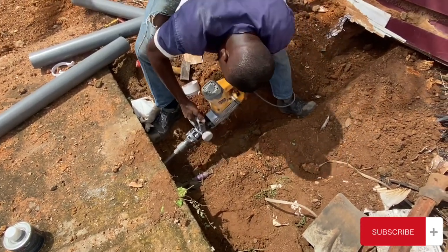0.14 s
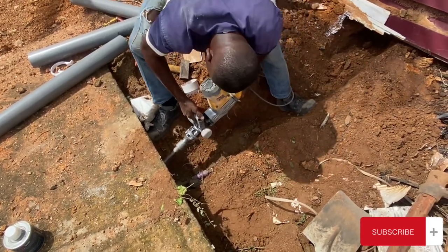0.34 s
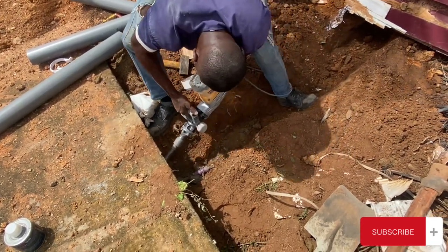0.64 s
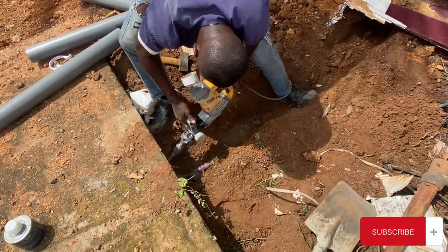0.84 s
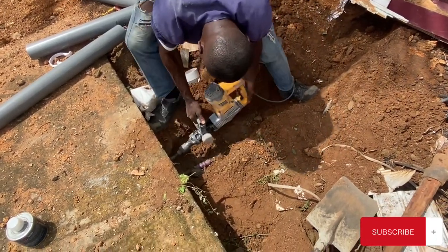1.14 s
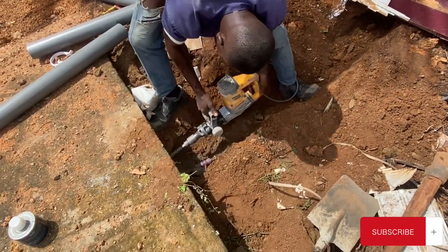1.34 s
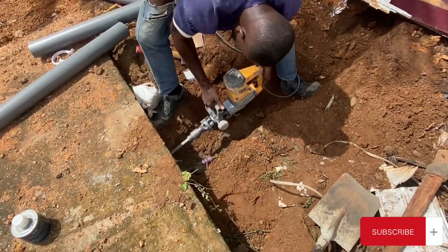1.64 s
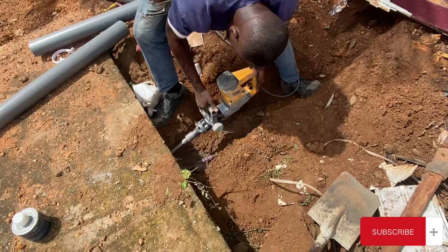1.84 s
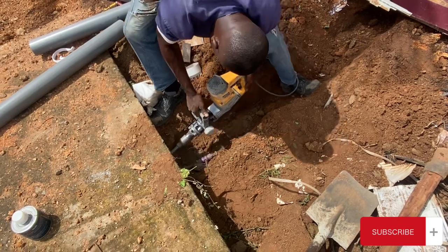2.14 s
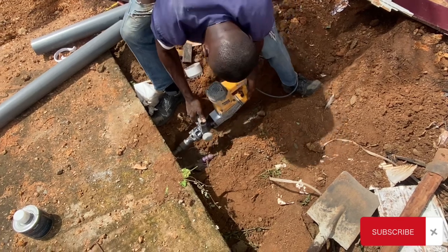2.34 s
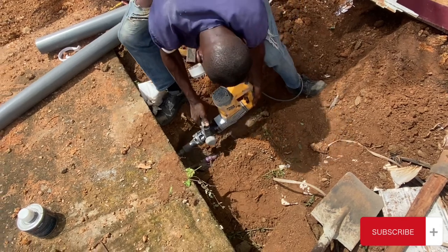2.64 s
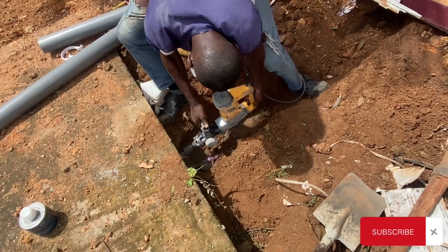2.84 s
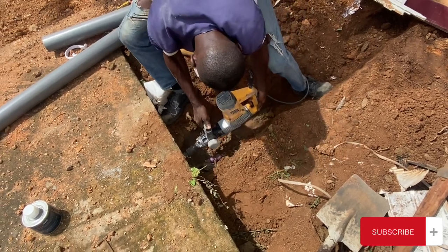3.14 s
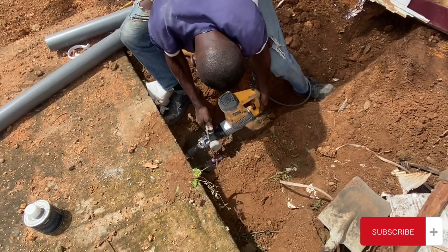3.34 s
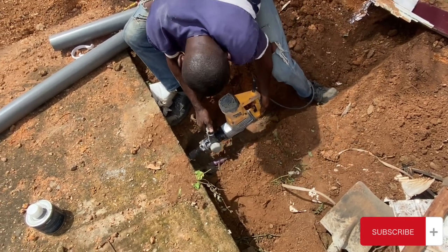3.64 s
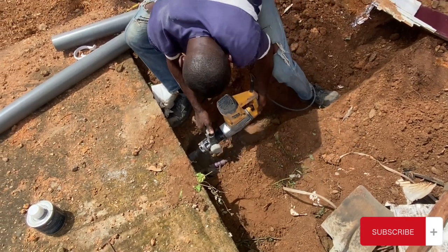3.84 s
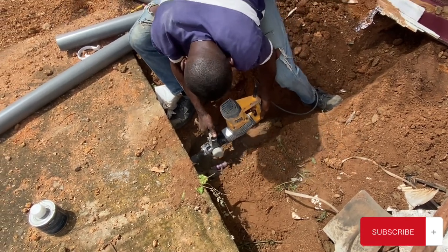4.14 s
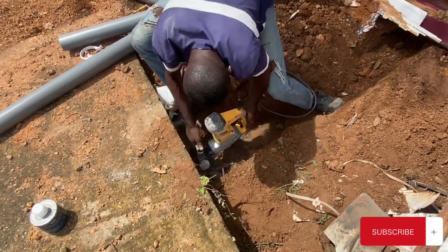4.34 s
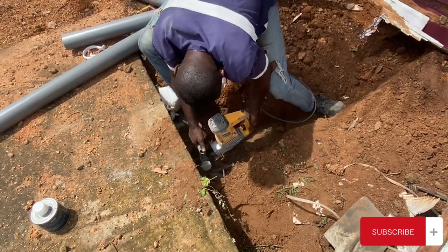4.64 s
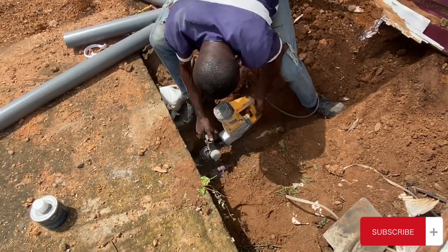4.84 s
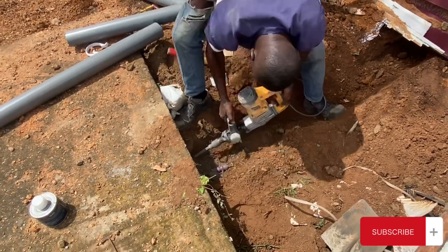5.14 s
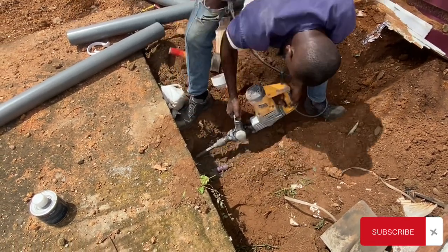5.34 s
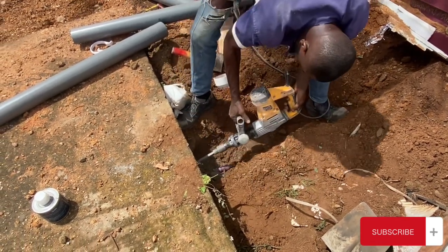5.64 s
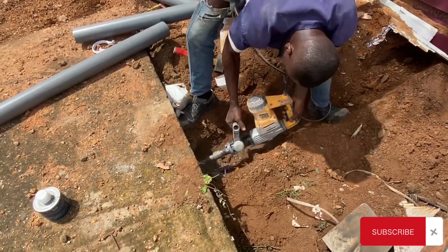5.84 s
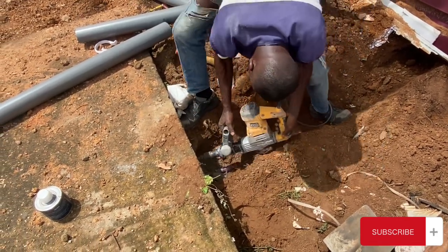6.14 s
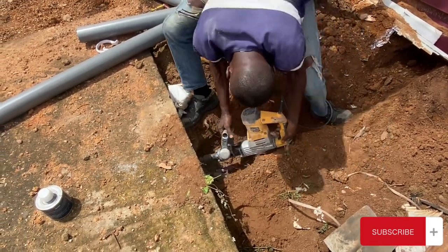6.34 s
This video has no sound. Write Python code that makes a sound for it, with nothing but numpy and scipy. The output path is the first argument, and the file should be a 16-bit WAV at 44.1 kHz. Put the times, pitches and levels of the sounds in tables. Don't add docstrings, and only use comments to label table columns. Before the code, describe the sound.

A heavy electric breaker works very near the microphone on an open building site with almost no echo. Three bursts of fast, dry, stony cracks with steel ring, casing clatter and low soil thumps, about thirty-seven blows a second. Between bursts a gritty motor whirr slows into separate chuffs. Small rattles surround the work; a faint site hum and a tiny distant bird call come before the first burst.

```python
import sys
import numpy as np
from scipy import signal
from scipy.fft import rfft, irfft, next_fast_len
from scipy.io import wavfile
from scipy.ndimage import uniform_filter1d

SR = 44100
rng = np.random.default_rng(int(sys.argv[2]) if len(sys.argv) > 2 else 0)


def log_audio(samples):
    frames = np.atleast_2d(samples).T
    limited = np.clip(frames, -1, 1)
    pcm = np.round(limited * 32767).astype(np.int16)
    wavfile.write(sys.argv[1], SR, pcm)


def elevation(decibels):
    levels = np.asarray(decibels, float)
    return 10 ** (levels / 20)


N = 285768
TIME = np.arange(N) / SR
HZ = np.maximum(np.fft.rfftfreq(N, 1 / SR), 1)


def in_time(rows):
    s, *columns = np.transpose(rows)
    return [np.interp(TIME, s, c) for c in columns]


def at_hz(points):
    hz, value = np.transpose(points)
    return np.interp(np.log(HZ), np.log(hz), value)


def rms_one(x):
    return x / np.sqrt(np.mean(x ** 2))


def noise(gain):
    return rms_one(irfft(rfft(rng.standard_normal((2, N))) * gain, N))


def drift(rate):
    step = max(int(SR / rate / 12), 1)
    lowpass = signal.butter(2, rate, fs=SR / step, output="sos")
    slow = signal.sosfilt(lowpass, rng.standard_normal(N // step + 102))[100:]
    return np.interp(np.arange(N) / step, np.arange(len(slow)), rms_one(slow))


def clicks(s, size):
    out = np.full(np.shape(size)[:-1] + (N,), 1e-18)
    out[..., np.clip(np.round(s * SR).astype(int), 0, N - 1)] = size
    return out


def fade(x, t60, rise_s):
    r, rise = elevation(-60 / (t60 * SR)), np.exp(-1 / (rise_s * SR))
    return signal.lfilter([1], [1, -r], signal.lfilter([1 - rise], [1, -rise], x))


def struck(modes, s, db, spread_db):
    out = 0
    chance = rng.standard_normal((len(s), len(modes), 2)).T
    for (hz, mode_db, t60), luck in zip(modes, chance.transpose(1, 0, 2)):
        r, w = elevation(-60 / (t60 * SR)), 2 * np.pi * hz / SR
        hits = clicks(s, elevation(db + mode_db + spread_db * luck))
        out = out + signal.lfilter([0, np.sin(w)], [1, -2 * r * np.cos(w), r * r], hits)
    return out


# first blow in seconds, last blow in seconds, number of blows,
# time lost gathering speed in seconds.
RUNS = [
    (.534, 1.134, 21, .047),
    (1.923, 3.091, 42, .045),
    (3.118, 3.199, 4, 0),
    (3.2256, 3.489, 11, 0),
    (3.515, 4.216, 27, 0),
    (4.243, 4.355, 5, 0),
    (6.341, 6.464, 4, .062),
]
GATHER_BLOWS = 2.8


def strokes():
    s, slow = [], []
    for first, last, blows, lost in RUNS:
        n = np.arange(blows)
        late = lost * (1 - np.exp(-n / GATHER_BLOWS))
        s.append(first + late + n / n[-1] * (last - first - late[-1]))
        slow.append((lost > 0) * np.exp(-n / GATHER_BLOWS))
    return np.concatenate(s), np.concatenate(slow)


LOAD_FADE_S = 0.028


def load():
    on = sum((TIME > a) & (TIME < b + .027) for a, b, *_ in RUNS).clip(0, 1)
    r = np.exp(-1 / (LOAD_FADE_S * SR))
    return np.maximum(uniform_filter1d(on * 1., size=2000), signal.lfilter([1 - r], [1, -r], on))


# frequency in Hz, density in dB per Hz.
CRACK_COLOUR = [(300, -1.5), (700, -7.5), (860, -15), (1050, -7.5), (1500, -7), (2200, -1.5), (3000, 2),
                (4500, -0.5), (6200, -1), (7500, -1), (9500, 4), (11300, 5), (12600, 13), (14000, -19),
                (15500, -8)]


def crack(s, db, bounce_s, bounce_db):
    out, spectrum = 0, rfft(noise(elevation(at_hz(CRACK_COLOUR))))
    for hz in np.geomspace(300, 15000, 7):
        luck = rng.standard_normal((len(s), 3)).T
        band_gain = np.clip(1 - np.abs(np.log(HZ / hz) / np.log(50) * 6), 0, 1)
        band = irfft(spectrum * band_gain, N)
        hits = clicks(s + 0.00056 * np.abs(luck[0]), elevation(db + 2.9 * luck[1]))
        hits = hits + clicks(bounce_s, elevation(bounce_db + 3.5 * luck[2]))
        t60 = 0.023 * (hz / 4000) ** -.2
        snap = fade(hits, t60, rise_s=0.00042)
        tail = elevation(-14.5) * fade(hits, 2.85 * t60, rise_s=0.003)
        out = out + band * (snap + tail)
    grit_db = 3.1 * np.clip(drift(1280), -2, 2)
    return elevation(grit_db) * out


# frequency in Hz, level in dB, t60 in seconds.
CASING = [(1308, 8.5, 0.059), (1488, -3, 0.06), (1841, -1.5, 0.027), (2400, 10.5, 0.087),
          (2900, -23, 0.036), (3533, 7.5, 0.027), (4435, 8, 0.049), (6220, 8, 0.065), (8115, 18.5, 0.027)]
SUNK_CASING_DB = [-17.5, 10.5, -6, 0.5, 0, -18.5, 0, -7, 2]
CASING_DB = -32.5


def clatter(s, db, bounce_s, bounce_db, clatter_db, depth):
    casing = [(hz, mode_db + sunk_db * np.tile(depth, 2), t60)
              for (hz, mode_db, t60), sunk_db in zip(CASING, SUNK_CASING_DB)]
    hits_db = np.r_[db + clatter_db, bounce_db + clatter_db] + CASING_DB
    return struck(casing, np.r_[s + .001, bounce_s], hits_db, spread_db=4.5)


# frequency in Hz, level in dB, t60 in seconds.
CHISEL = [(11042, 0, .2), (11080, 2.5, .09), (9535, -6, .05), (10400, -7, .05), (14130, -12, .05),
          (8400, -14, .03)]
RING_DB, REBOUND_RING_DB = -0.5, -1.5
SUNK_HUM_DB, SLOW_RING_DB = -12, -6


def chisel_ring(s, bounce_s, ring_db, slow, depth, late):
    steel = [(hz, mode_db + SUNK_HUM_DB * np.tile(depth, 2) * (t60 > .1), t60) for hz, mode_db, t60 in CHISEL]
    hits_db = np.tile(RING_DB + ring_db + SLOW_RING_DB * slow, 2) + REBOUND_RING_DB * np.r_[late, ~late]
    return struck(steel, np.r_[s, bounce_s], hits_db, spread_db=4.5)


# frequency in Hz, level in dB, t60 in seconds.
GROUND = [(106, -3.5, 0.12), (135, -27, 0.091), (185.4, -5.5, 0.19), (224, -11.5, 0.15), (259, -11, 0.085),
          (343.6, -6.5, 0.18), (384, -9.5, 0.2), (404, -6.5, 0.077), (478, 2, 0.053), (641.5, -9, 0.11),
          (708, -7, 0.053), (744, -27, 0.15), (777, -25, 0.053)]
# delay in seconds, level in dB, brightness in dB per octave.
PUSHES = [
    (.0012, -3.5, 16),
    (.0055, -12.5, 15),
    (0.0188, -4, -3),
]
THUMP_DB, SUNK_THUMP_DB, BRIGHT_DB, SUNK_BRIGHT_DB = -44.5, 12.5, -4, 7.5
BREAK_S, BROKEN_THUMP_DB, GIVING_BRIGHT_DB = 4.23, -21, -1
SETTLED_S, SETTLED_HZ, SETTLED_DB = 3.56, 230, 4
JITTER_S = .00004


def thump(even, depth):
    thump_db, bright_db = THUMP_DB + SUNK_THUMP_DB * depth, BRIGHT_DB + SUNK_BRIGHT_DB * depth
    thump_db += BROKEN_THUMP_DB * depth * (even > BREAK_S)
    giving = np.gradient(even) < 1 / 37.4
    bright_db += GIVING_BRIGHT_DB * uniform_filter1d(1. * giving, size=7)
    delay, push_db, tilt_db = np.transpose(PUSHES)[:, :, None]
    ground = []
    for hz, mode_db, t60 in GROUND:
        boom_db = SETTLED_DB * (even > SETTLED_S) * (hz < SETTLED_HZ)
        colour_db = (tilt_db + bright_db) * np.log2(hz / 400) + boom_db
        ground.append((hz, mode_db + colour_db.ravel(), t60))
    s = even + JITTER_S * rng.standard_normal(len(even)) + delay
    return struck(ground, s.ravel(), (thump_db + push_db).ravel() + 3, spread_db=1.5)


# time in seconds, force in dB, depth from 0 to 1,
# casing rattle in dB.
BITE = [(.53, -13, 0.15, -2.5), (.72, -15, 0.15, 0), (.8, -10, 0, -1.5), (1.14, -9, 0.17, -1.5),
        (1.92, -15, 0, -4), (2.2, -13, 0, -2), (2.42, -11, 0.21, 0), (2.62, -8, 0.77, -7),
        (2.68, -14, 0.43, -5), (3.0, -10, 0.74, 1), (3.2, -18, 0.95, 0.5), (3.62, -14, 0.74, 2),
        (4.2, -21, 0.9, 8.5), (4.3, -15.5, 0.9, 2.5), (4.36, -17.5, 0.93, 6), (6.34, -12, 1, 2),
        (6.39, -16, 1, -3.5), (6.47, -3, 0.34, 7.5)]
# time in seconds, peak in dB, chisel ring # under
# it in dB.
BLOW_CRACKS = [(0.5314, -12.5, -13), (0.5755, -6.5, -33), (0.6126, -14, -7), (0.648, -7.5, -14),
               (0.678, -11.5, -27), (0.7088, -12, -12), (0.7402, -9.5, -18), (0.7684, -5, -17),
               (0.797, -6.5, -24), (0.8249, -3.5, -25), (0.854, -9.5, -10), (0.8826, -5, -25),
               (0.9094, -10, -11), (0.9378, -4.5, -20), (0.9667, -7.5, -21), (0.992, -3, -18),
               (1.0224, -8, -8.5), (1.0493, -7, -12), (1.0772, -3, -20), (1.104, -6.5, -17),
               (1.1364, -7.5, -11),
               (1.9239, -12.5, -18), (1.9661, -10.5, -14), (2.0106, -14, -2.5), (2.038, -8, -21),
               (2.07, -9, -18), (2.0975, -6, -13), (2.136, -11, -7), (2.1615, -13, -10),
               (2.1858, -12.5, -4.5), (2.2129, -2.5, -15.5), (2.2419, -11.5, -4.5), (2.2753, -11.5, -12),
               (2.2973, -5, -15.5), (2.3253, -2.5, -17), (2.359, -13, -4), (2.386, -9, -13),
               (2.409, -6, -20), (2.4362, -5.5, -15), (2.4645, -7.5, -10), (2.4972, -8, -15),
               (2.5178, -4.5, -11.5), (2.542, -5, -30), (2.5714, -7, -14), (2.598, -4.5, -20),
               (2.6265, -4.5, -14.5), (2.654, -11, -9), (2.681, -9.5, -21), (2.7088, -15, -6),
               (2.736, -6.5, -22), (2.7628, -14, -12), (2.7982, -15, -10), (2.8223, -15, -18),
               (2.844, -10.5, -29), (2.8726, -12, -8.5), (2.9044, -17, -12), (2.9311, -15, -5.5),
               (2.9537, -11, -25), (2.9811, -12, -13.5), (3.0086, -12, -11), (3.0335, -12.5, -31),
               (3.0624, -12.5, -29), (3.0898, -14, -15), (3.1175, -11, -25),
               (3.0903, -10.5, -28), (3.1168, -8.5, -27), (3.1426, -12, -30), (3.1715, -11, -18),
           (3.1973, -10.5, -16), (3.2247, -15.5, -32), (3.251, -10, -39), (3.2775, -11.5, -16),
           (3.3036, -12, -16), (3.3299, -8, -26), (3.357, -14, -20), (3.3831, -10, -18), (3.4082, -14, -32),
           (3.4355, -10, -36), (3.461, -13, -26), (3.487, -12.5, -20), (3.5143, -11, -24),
           (3.5477, -15.5, -11.5), (3.5701, -8, -36), (3.5958, -12, -30), (3.6232, -13, -16),
           (3.6498, -15, -17), (3.676, -12, -25), (3.711, -17.5, -8), (3.7313, -11, -24), (3.757, -13, -25),
           (3.784, -12, -29), (3.8118, -12.5, -30), (3.838, -15, -25), (3.8656, -15.5, -25),
           (3.892, -11.5, -24), (3.9192, -10.5, -33), (3.9463, -13, -33), (3.973, -12, -32),
           (4.0008, -11, -26), (4.0276, -13.5, -29), (4.0553, -12, -27), (4.08, -14.5, -27),
           (4.108, -16.5, -15), (4.133, -13, -32), (4.162, -14, -35), (4.1874, -16.5, -28),
           (4.2154, -16, -33), (4.2435, -13.5, -32), (4.272, -14, -18), (4.2988, -14.5, -14),
           (4.329, -7, -31), (4.354, -17.5, -10),
               (6.3405, -14.5, -24),
    (6.39, -9.5, -13.5),
    (6.4292, -8, -26),
    (6.465, -9, -14),
]
LATE_S = .0045
CRACK_DB, LATE_BLOW_DB, CASING_FOLLOWS = 0.3, 1.5, 0.74


def hammer():
    even, slow = strokes()
    rows = np.array(BITE)
    force_db, depth, clatter_db = [np.interp(even, rows[:, 0], rows[:, k]) for k in (1, 2, 3)]
    cracks = np.array(BLOW_CRACKS)
    nearest = np.abs(cracks[:, :1] - .002 - even).argmin(axis=0)
    when, peak_db, ring_db = cracks[nearest].T
    late = when - even > LATE_S
    s = np.where(late, even, when)
    clatter_db = clatter_db + (1 - CASING_FOLLOWS) * (force_db - peak_db)
    db = peak_db + CRACK_DB + LATE_BLOW_DB * late
    luck = rng.random((len(s), 2)).T
    bounce_s = np.where(late, when, s + .0065 + .003 * luck[0])
    bounce_db = np.where(late, peak_db + CRACK_DB, db - 3 - 8 * luck[1])
    casing = clatter(s, db, bounce_s, bounce_db, clatter_db, depth)
    steel = chisel_ring(s, bounce_s, peak_db + ring_db, slow, depth, late)
    return elevation(-5.0) * crack(s, db, bounce_s, bounce_db) + casing + steel + thump(even, depth)


# start in seconds, current off in seconds, end in seconds, turns.
IDLES = [
    (1.136, 1.136, 1.926, 21),
    (4.358, 4.925, 6.268, 69),
]
FIRST_TURN_S = .47
LOADED_PER_S, FREE_PER_S, RUN_UP_S = 36.6, 51, .13
RUN_DOWN_S, FRICTION_PER_S2 = 2.5, 13.4


def crank_turns():
    moments = [strokes()[0] + .003, [FIRST_TURN_S, IDLES[-1][2]]]
    drag = FRICTION_PER_S2 * RUN_DOWN_S
    for start, off, end, turns in IDLES:
        t = TIME[(TIME > start) & (TIME < end)]
        run_up = np.exp((start - np.minimum(t, off)) / RUN_UP_S)
        powered = FREE_PER_S - (FREE_PER_S - LOADED_PER_S) * run_up
        speed = (powered + drag) * np.exp(-np.maximum(t - off, 0) / RUN_DOWN_S) - drag
        done = np.cumsum(speed)
        moments.append(np.interp(np.arange(1, turns), done / done[-1] * turns, t))
    moments = np.sort(np.concatenate(moments))
    return np.interp(TIME, moments, np.arange(len(moments)))


MULTIPLES = [1, 5, 5.9, 7, 8, 83, 124, 40.5, 89.5]
# level under the whirr in dB, waver in dB.
TONES = [(-37, 2.5), (-26, 4), (-21, 4), (-26, 4), (-23, 4), (-18, 5), (-10, 4), (-18, 4), (-17, 5)]


def whines(turns, octaves, peaks):
    shaft = turns + .002 * drift(30)
    voiced = (.3 + peaks / 3 * (HZ > 1000) + .7 * (HZ < 1000)) ** 1.5
    tones = 0
    for k, (db, waver_db) in zip(MULTIPLES, TONES):
        resonance = np.interp(k * 37 * 2 ** octaves, HZ, voiced)
        tones = tones + elevation(db + waver_db * drift(18)) * resonance * np.sin(2 * np.pi * k * shaft)
    return tones * (np.gradient(turns) * SR / 45) ** 1.45


# time in seconds, level in dB.
MAINS = [
    (1.14, -75),
    (1.186, -61),
    (1.65, -74),
]


def mains_hum():
    dying = (TIME > MAINS[0][0]) & (TIME < MAINS[-1][0])
    return dying * elevation(in_time(MAINS)[0] + 3) * np.sin(2 * np.pi * 89.0 * TIME)


# frequency in Hz, density in dB per Hz.
WHIRR = [(40, -18), (110, -12), (250, -3), (420, 1.5), (570, 0), (740, 5.5), (870, -2), (1100, 0),
         (1500, 2), (2200, 1.5), (3000, 2), (4500, -2), (6000, -5), (8000, -6), (10000, -5.5),
         (12500, -5.5), (14500, -18.5)]
# frequency in Hz, width in Hz, level in dB.
HOUSING = [(937, 74, 8.5), (1187, 20, 5), (1496, 100, 6), (1800, 31, 6), (1942, 97, 8.5), (2350, 30, 0.5),
           (2590, 154, 12.5), (2997, 58, 10), (4090, 100, 3), (4500, 340, 3)]
# frequency in Hz, width in Hz, level in dB.
GRIPPED_HOUSING = [(900, 91, 4.5), (1320, 70, -1.5), (1475, 69, 3.5), (1822, 34, 11.5), (1926, 26, 8.5),
                   (2385, 72, 10), (2630, 75, 8), (3020, 140, 8.5), (4100, 130, 2), (4760, 140, 6.5)]
# time in seconds, level in dB.
VENTS = [(1.2, 2.1), (1.9, 2.7), (4.3, 2.8), (4.45, -1.5), (4.8, -1), (5.05, 2.5), (5.5, 3), (6.1, 1.9),
         (6.48, 6.5)]
SWITCH_ON_S, GRIP_SHIFTS_S = .44, 3
WHIRR_DB, WHIRR_DB_PER_OCT, LOAD_DB, SUNK_WHIRR_DB = -37, 8, 3.5, -4.5
CHUFF_DB, CHUFF_DB_PER_OCT = 6, -3
BASS_DB, BASS_DB_PER_OCT, SUNK_BASS_DB, RUMBLE_TOP_DB = -12, -0.5, 53, 1


def motor():
    turns = uniform_filter1d(crank_turns(), size=2000)
    octaves = np.log2(np.maximum(np.gradient(turns) * SR, 12) / 37)
    loaded = load()
    sunk = loaded * in_time(BITE)[1] * (TIME < BREAK_S)
    whirr_db = WHIRR_DB + WHIRR_DB_PER_OCT * octaves + LOAD_DB * loaded
    whirr_db = whirr_db + SUNK_WHIRR_DB * sunk + in_time(VENTS)[0]
    chuff_db = np.clip(CHUFF_DB + CHUFF_DB_PER_OCT * octaves, 0, 11)
    bass_db = BASS_DB + SUNK_BASS_DB * sunk + BASS_DB_PER_OCT * octaves
    peaks, gripped = [sum(elevation(db + 2.5) / (1 + ((HZ - hz) / width) ** 2) for hz, width, db in shell)
                      for shell in (HOUSING, GRIPPED_HOUSING)]
    low = 1 / (1 + (HZ / 700) ** 4)
    whirr = elevation(at_hz(WHIRR))
    stroke = np.cos(2 * np.pi * turns)
    stroke = stroke + 0.015 * np.cos(4 * np.pi * turns) - .3
    early, later = map(rms_one, noise(whirr * (1 - low) * np.array([[gripped], [peaks]])))
    chuff = elevation(chuff_db * stroke * .85 + 1.5 * drift(120)) * np.where(TIME < GRIP_SHIFTS_S, early, later)
    air = elevation(chuff_db * stroke * 0.31 - 1.0) * noise(whirr * (1 - low))
    rumble_db = np.minimum(bass_db, RUMBLE_TOP_DB) - 4.0 + chuff_db * stroke * 0.22
    rumble = elevation(rumble_db) * noise(whirr * low)
    tones = whines(turns, octaves, peaks)
    switched_on = np.clip((TIME - SWITCH_ON_S) / 0.045, 0, 1)
    return elevation(whirr_db) * switched_on * (chuff + air + rumble + tones) + mains_hum()


# start in seconds, peak in dB, t60 in seconds, dullness in dB.
KNOCKS = [
    (0.04, -42.5, 0.15, 13),
    (0.106, -38, 0.15, 11),
    (0.428, -52, 0.24, 11),
    (1.857, -23.5, 0.36, 7),
    (6.235, -27.5, 0.073, 0),
    (6.265, -19.5, 0.045, -8),
    (6.287, -25, 0.14, 5),
]


def knocks():
    bright = noise(elevation(at_hz(CRACK_COLOUR)))
    dull = noise(elevation(at_hz(WHIRR)) / (1 + (300 / HZ) ** 3))
    start, peak_db, _, dull_db = np.transpose(KNOCKS)
    shell = struck(CASING[:2], start, peak_db - 30 + dull_db * .7, spread_db=2)
    swells = np.array([elevation(db - 12.5) * fade(clicks(np.array([s]), np.ones(1)), t60, 0.00027)
                       for s, db, t60, _ in KNOCKS])
    return shell + swells.sum(axis=0) * dull + elevation(-dull_db) @ swells * bright


# start in seconds, pitch in Hz, peak in dB,
# t60 in seconds, glide in Hz per second.
BUMPS = [(.458, 720, -39.5, .09, 3000), (.488, 990, -46, 0.11, 2500), (.458, 1800, -49, 0.16, 6004),
         (.468, 400, -53, 0.082, 1004), (1.854, 1186, -39, .07, 0), (1.86, 765, -37, 0.1, -500),
         (1.862, 109, -48, 0.2, 0), (5.55, 332, -46.5, 0.21, 0), (5.615, 335, -40, .12, 0),
         (6.16, 317, -47, 0.099, 0), (6.166, 140, -51.5, 0.13, 0), (6.235, 289, -46, 0.12, 0),
         (6.27, 110, -51, 0.21, 0)]
BUMP_RISE_S = 0.0065


def bumps():
    out = np.zeros(N)
    t = TIME[:SR // 2]
    for s, hz, db, t60, glide in BUMPS:
        swell = elevation(db - 60 * t / t60) * (1 - np.exp(-t / BUMP_RISE_S)) ** 2
        tone = swell * np.sin(2 * np.pi * (hz + glide * t / 2) * t)
        i = int(s * SR)
        out[i:i + len(t)] += 2 * tone[:N - i]
    return out


SHUDDER_HZ, SHUDDER_DB = 113, -50


def shudder():
    lagging = uniform_filter1d(load(), size=6000, origin=2000)
    soil = noise(1 / (1 + (np.log2(HZ / SHUDDER_HZ) / 0.5) ** 4))
    return elevation(SHUDDER_DB + 2.1 * drift(2.9)) * lagging * soil


CRUMBLE_S, CRUMBLE_HZ, CRUMBLE_DB, CRUMBLE_T60_S = 4.26, 275, -38.5, 0.65


def crumble():
    swell = fade(clicks(np.array([CRUMBLE_S]), np.ones(1)), CRUMBLE_T60_S, rise_s=0.029)
    lumps = noise(1 / (1 + (np.log2(HZ / CRUMBLE_HZ) / .7) ** 4))
    return elevation(CRUMBLE_DB + 1.5 * drift(25)) * swell * lumps


# frequency in Hz, density in dB per Hz.
SITE = [(40, -12), (100, 6), (250, -7), (600, -12), (1200, -25), (2500, -16), (5000, -27), (8000, -27),
        (12000, -57)]
# time in seconds, level in dB.
SITE_SWELL = [(0, 3), (.1, 3), (.17, 8), (.25, 0), (.34, -1), (.4, -2), (.5, -13)]
SITE_DB = -72.5


def site_hum():
    return elevation(SITE_DB + in_time(SITE_SWELL)[0]) * noise(elevation(at_hz(SITE)))


# time in seconds, pitch in Hz, level in dB.
BIRD = [(.17, 2900, -100), (.19, 2550, -82), (.22, 2350, -80), (.245, 2200, -95), (.265, 2600, -82),
        (.3, 2280, -86), (.33, 2700, -85), (.35, 2700, -100)]


def bird():
    hz, db = in_time(BIRD)
    answer_phase = 2 * np.pi * np.cumsum(1720 - 1500 * (TIME - .23)) / SR
    answer = elevation(-83) * np.exp(-((TIME - .24) / .035) ** 2) * np.sin(answer_phase)
    return elevation(db + 3 * drift(40)) * np.sin(2 * np.pi * np.cumsum(hz) / SR) + answer


# frequency in Hz, lead of the left port in radians.
PORT_PHASE = [(0, 0), (330, .55), (580, 1.8), (950, 1.6), (1890, -1.0), (2330, 3.1), (3190, 3.0),
              (4310, 10.2), (6630, 12.2), (8350, 9.2), (11600, 3.6), (12700, 2.9), (13400, 0.1),
              (14600, -0.1), (15300, -3.0), (16100, -3.2)]
# frequency in Hz, left over right in dB.
PORT_BALANCE = [(60, -1), (110, 0.5), (200, 1), (380, -3), (700, -2), (1290, 2.5), (2380, -8), (4400, 0.5),
                (8120, 1.5), (15000, -3)]
# frequency in Hz, left-right likeness from 0 to 1.
LIKENESS = [(30, .6), (70, .95), (700, .9), (1200, .4), (1700, .4), (2300, .8), (2800, .95), (3800, .3),
            (6500, .3), (7500, .8), (8200, .95), (11500, .95), (15000, .85)]
NOTCH_HZ, NOTCH_WIDTH_HZ, NOTCH_DB, TOP_HZ = 12200, 650, -17, 16000


def ports(pair):
    size = next_fast_len(N + 8192)
    stretch = lambda v: np.interp(np.fft.rfftfreq(size, 1 / SR), HZ, v)
    left, other = rfft(pair, size)
    alike = stretch(np.clip(at_hz(LIKENESS), 0, 1))
    tilt = stretch(elevation(at_hz(PORT_BALANCE) / 2))
    lead = stretch(np.interp(HZ, *np.transpose(PORT_PHASE)))
    right = alike * left * np.exp(-1j * lead) + np.sqrt(1 - alike ** 2) * other
    notch = elevation(NOTCH_DB * np.exp(-((HZ - NOTCH_HZ) / NOTCH_WIDTH_HZ) ** 2))
    colour = stretch(notch / (1 + (HZ / TOP_HZ) ** 40 + (HZ / 16200) ** 200))
    return irfft([left * tilt, right / tilt] * colour, size)[:, :N]


def scene():
    highpass = signal.butter(3, 150, "high", fs=SR, output="sos")
    blows = signal.sosfilt(highpass, hammer())
    near = blows + motor() + knocks() + bumps() + shudder() + crumble()
    return ports(near + site_hum()) + bird()


def low_pass(x):
    return signal.sosfilt(signal.butter(12, 16500, fs=SR, output="sos"), x)


def record(dry):
    mix = .95 * np.tanh(dry / .95)
    return low_pass(mix)


dry = scene()
out = record(dry)
log_audio(out)
```